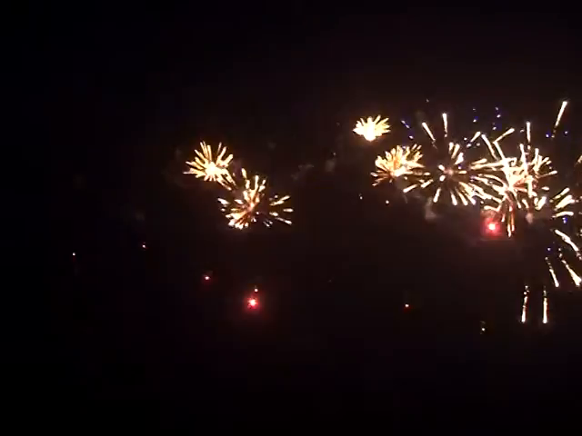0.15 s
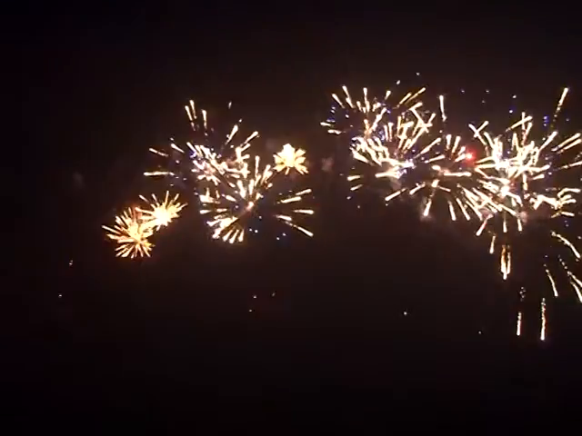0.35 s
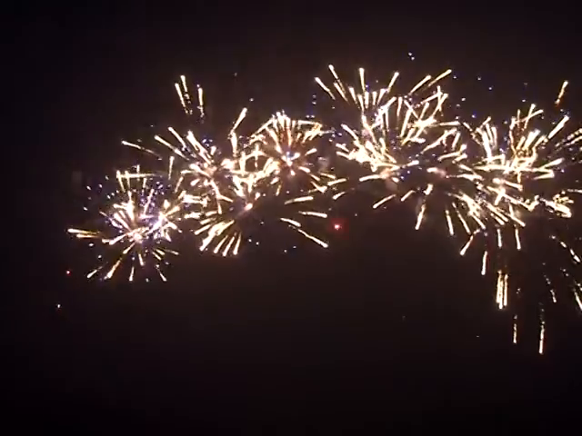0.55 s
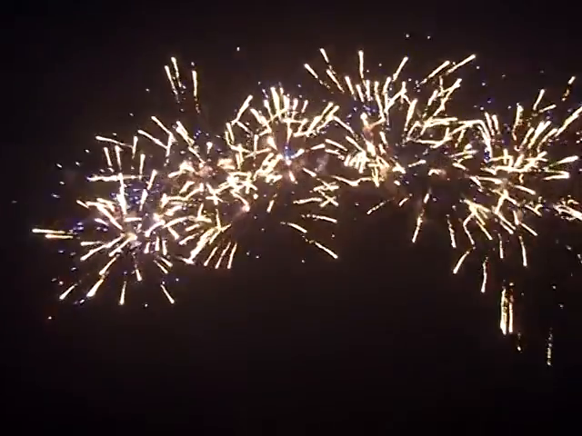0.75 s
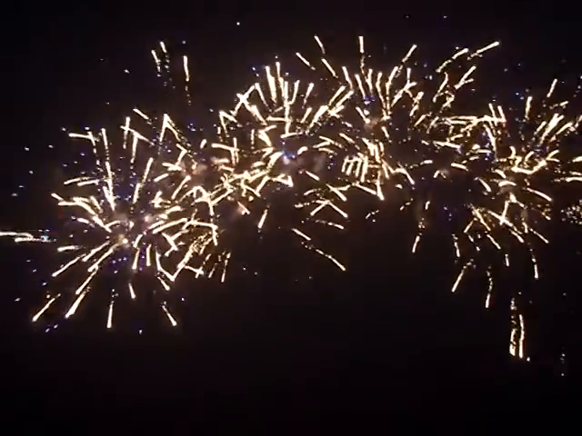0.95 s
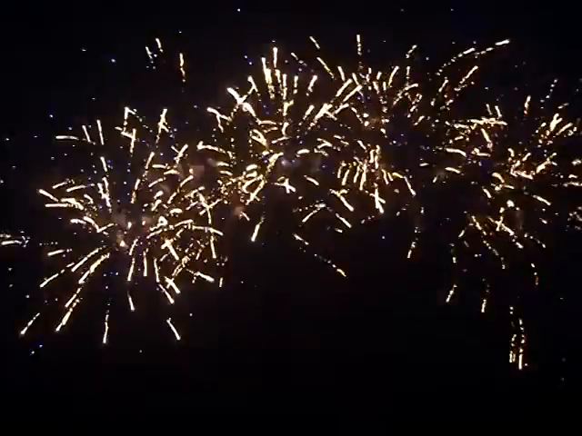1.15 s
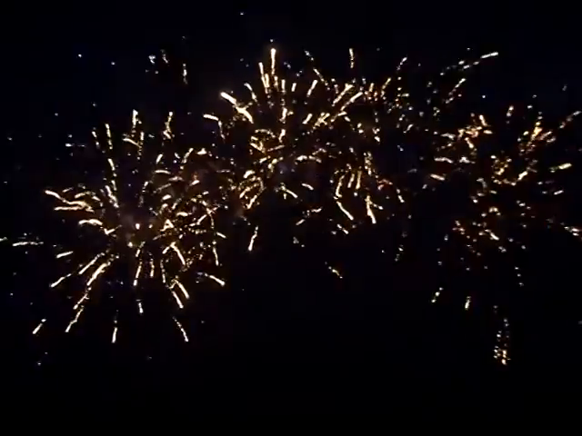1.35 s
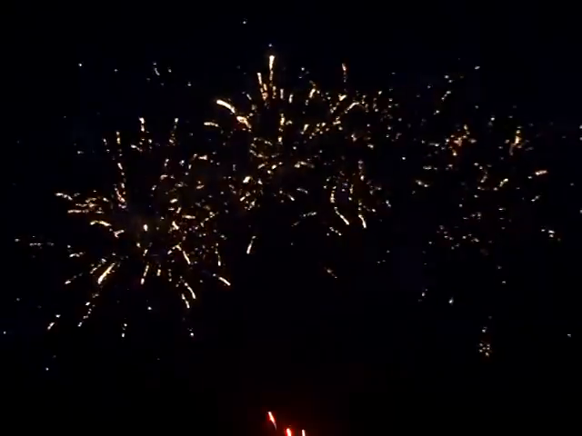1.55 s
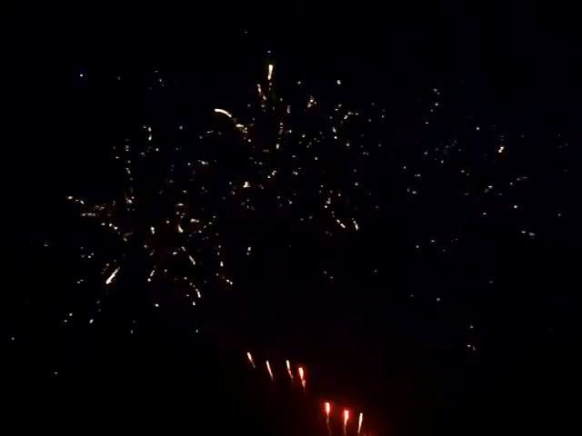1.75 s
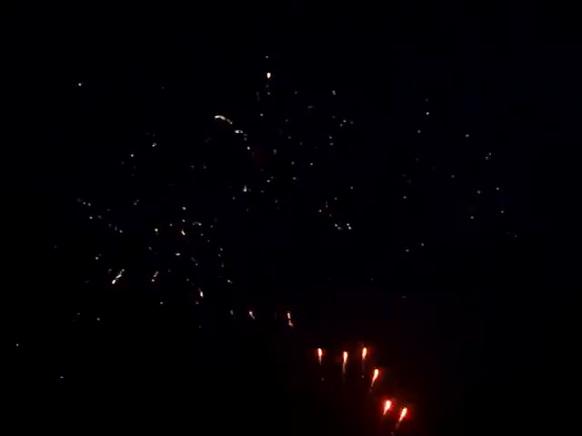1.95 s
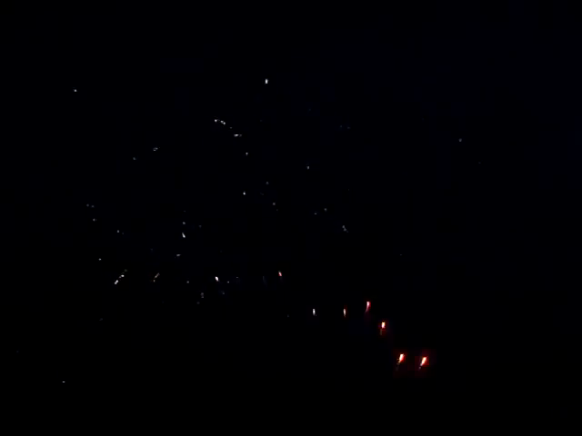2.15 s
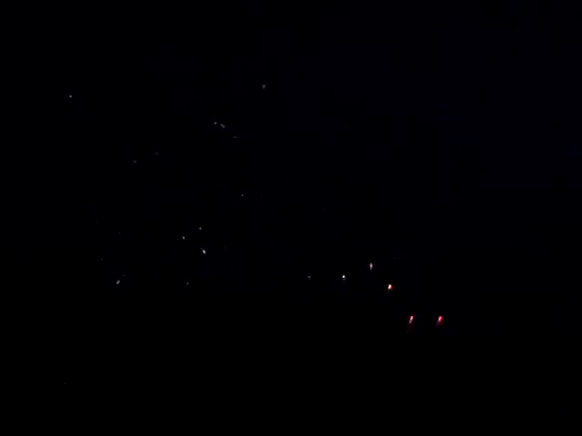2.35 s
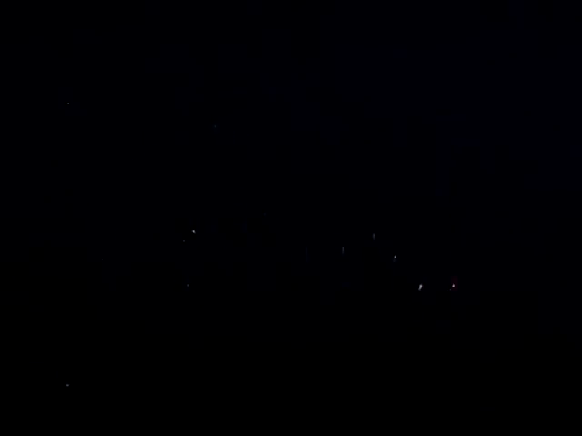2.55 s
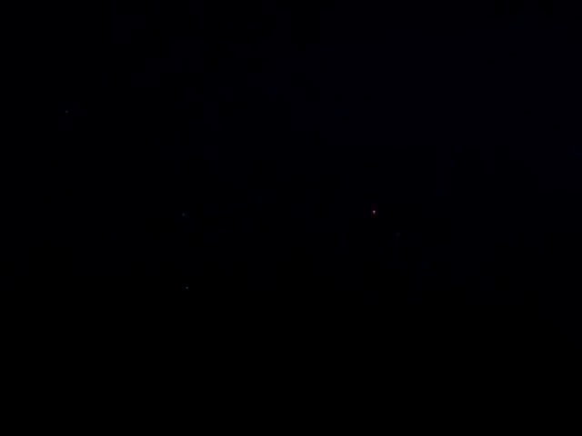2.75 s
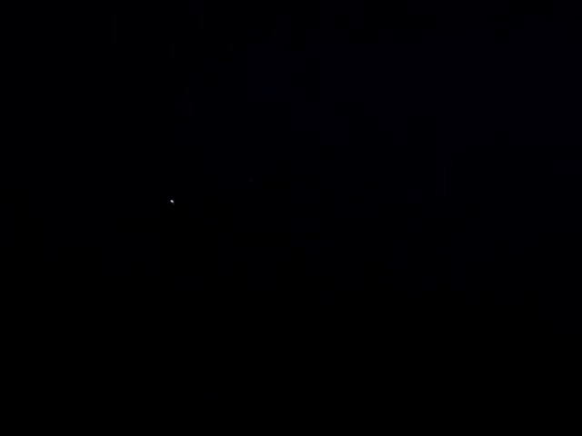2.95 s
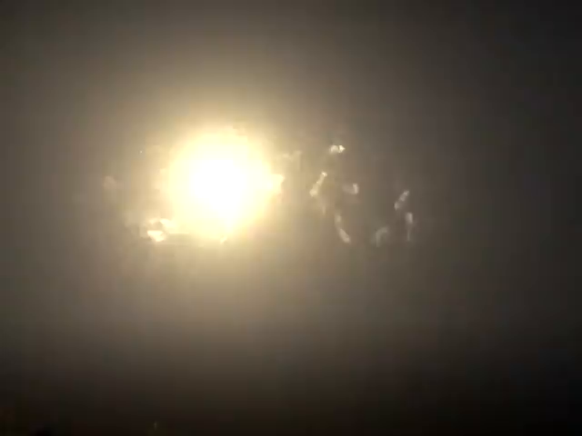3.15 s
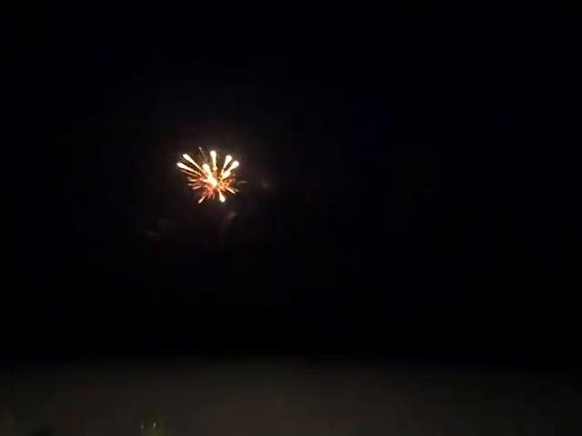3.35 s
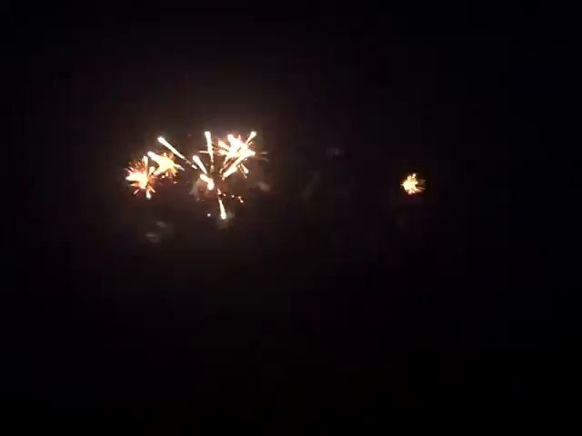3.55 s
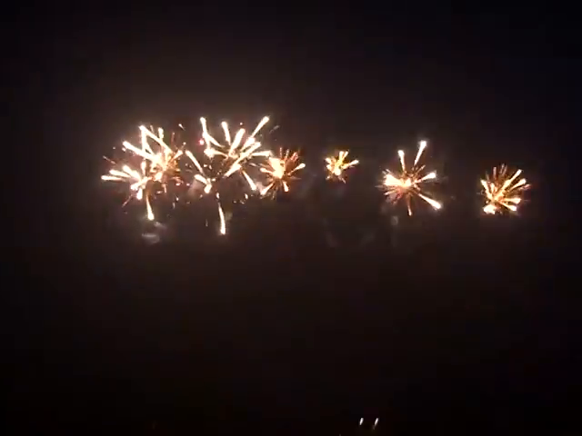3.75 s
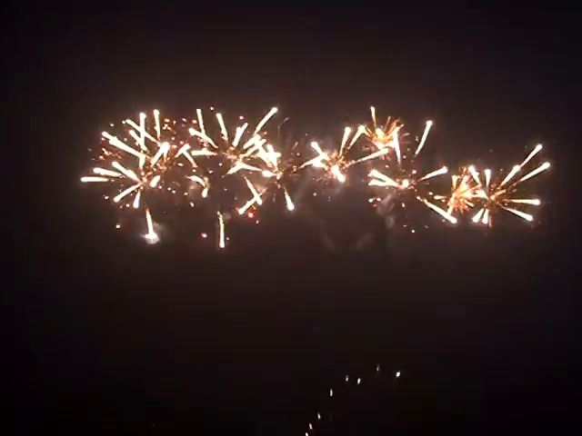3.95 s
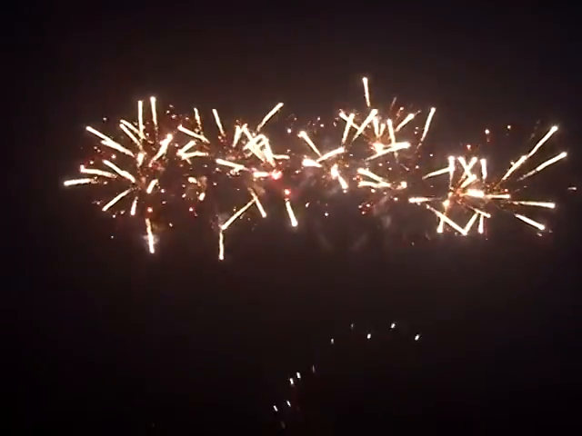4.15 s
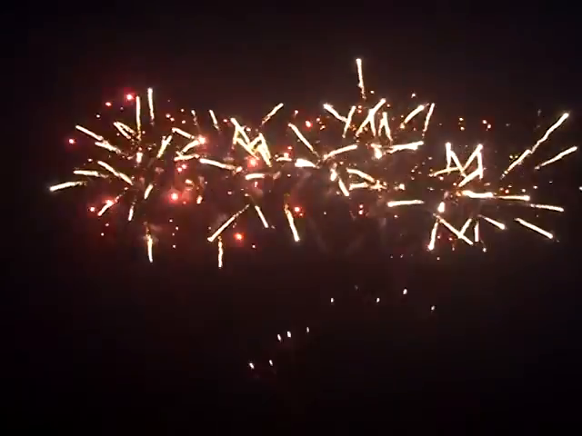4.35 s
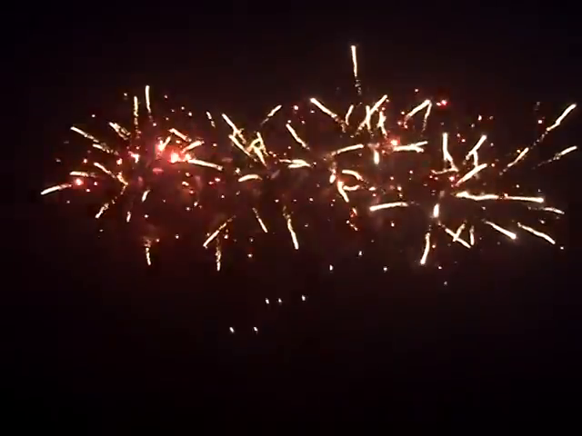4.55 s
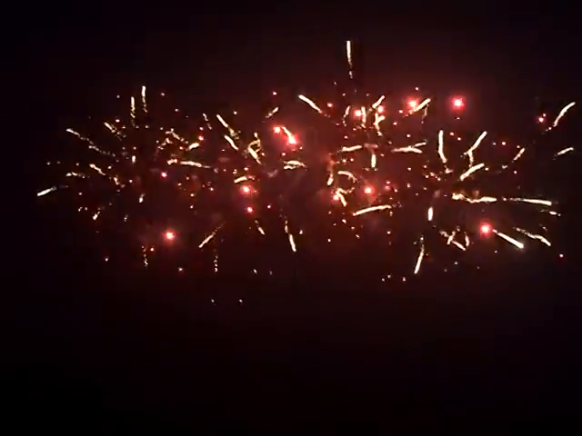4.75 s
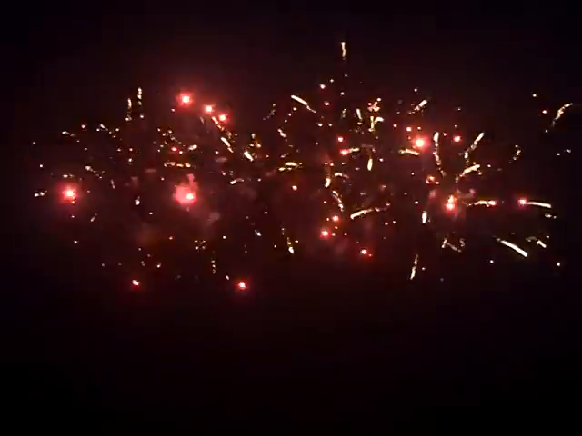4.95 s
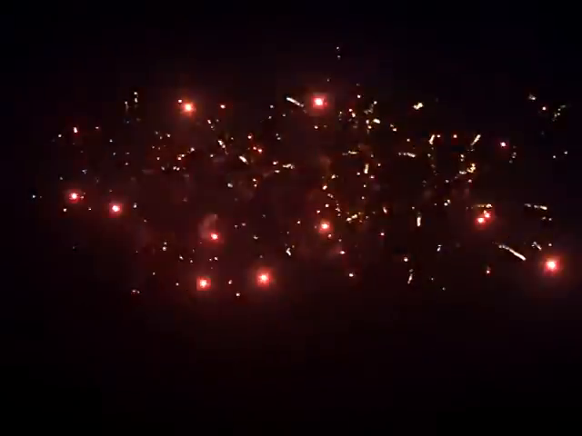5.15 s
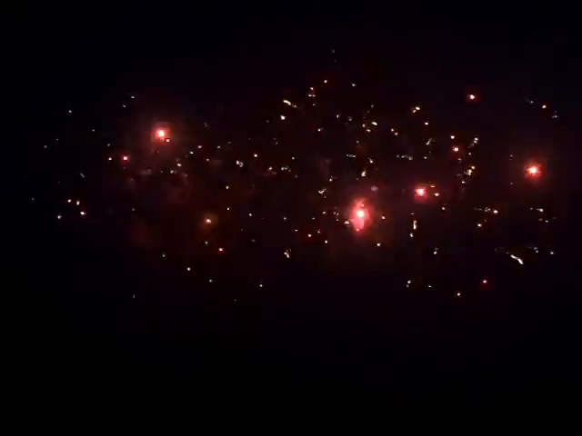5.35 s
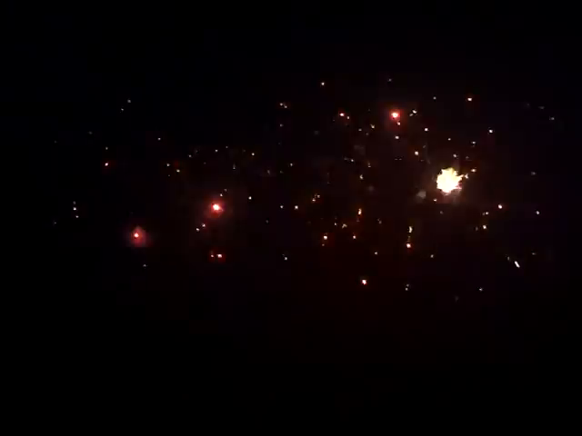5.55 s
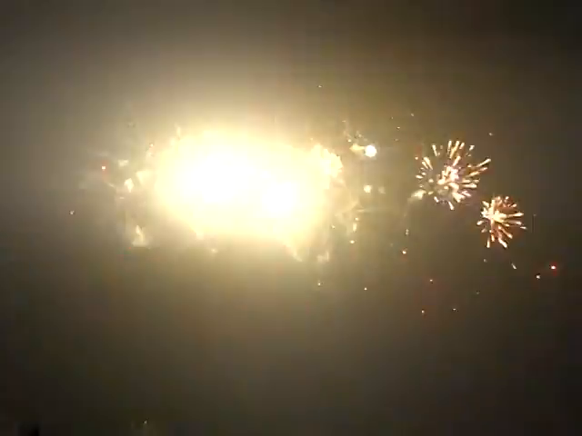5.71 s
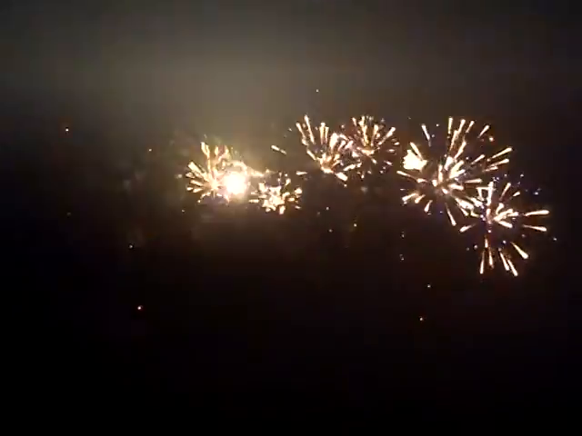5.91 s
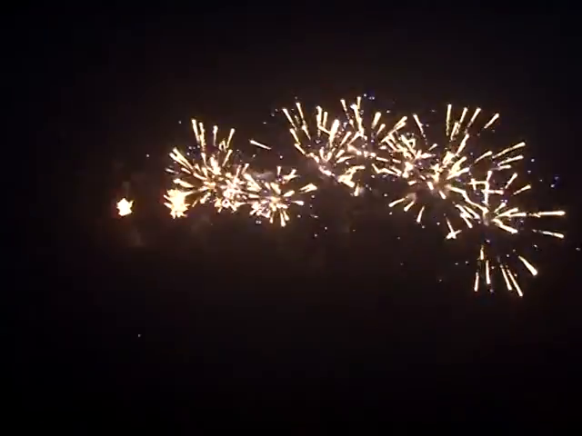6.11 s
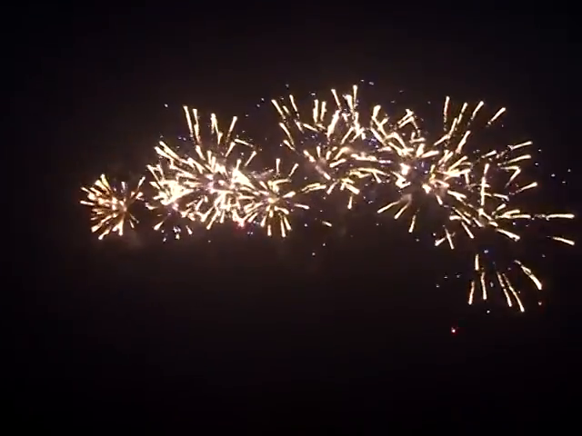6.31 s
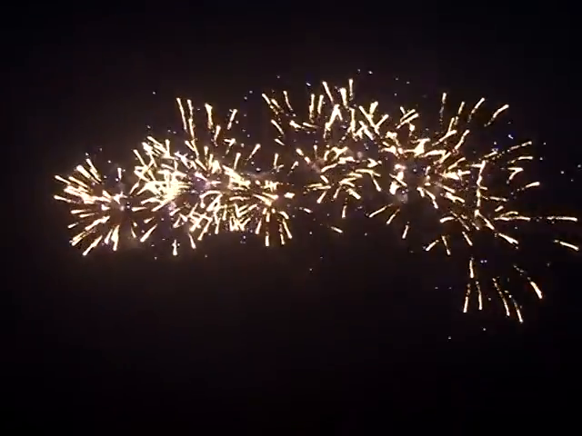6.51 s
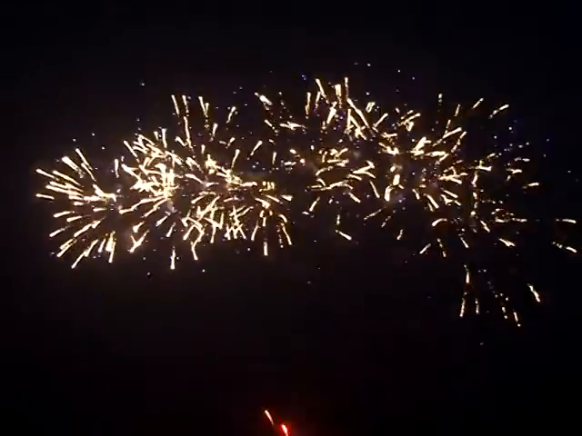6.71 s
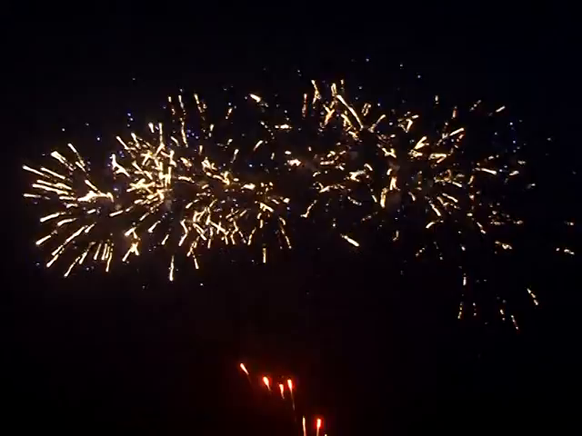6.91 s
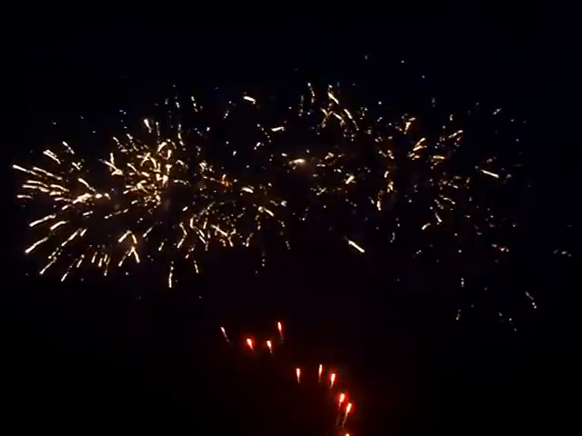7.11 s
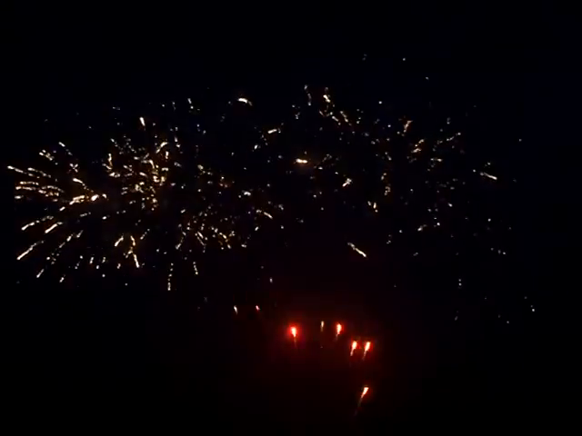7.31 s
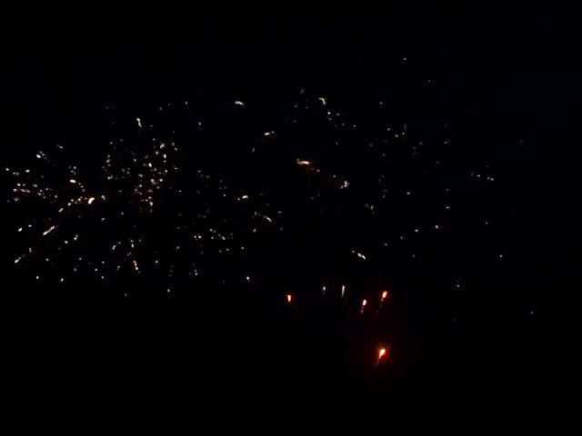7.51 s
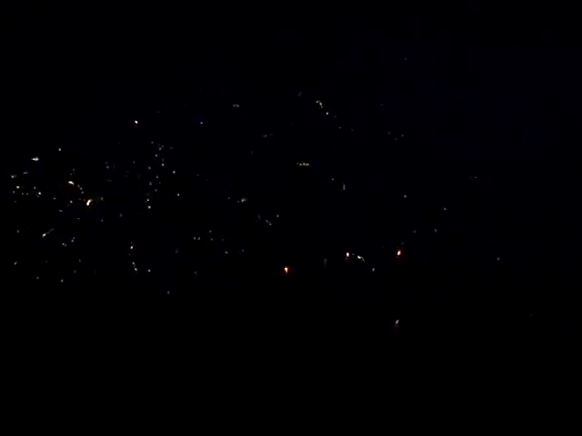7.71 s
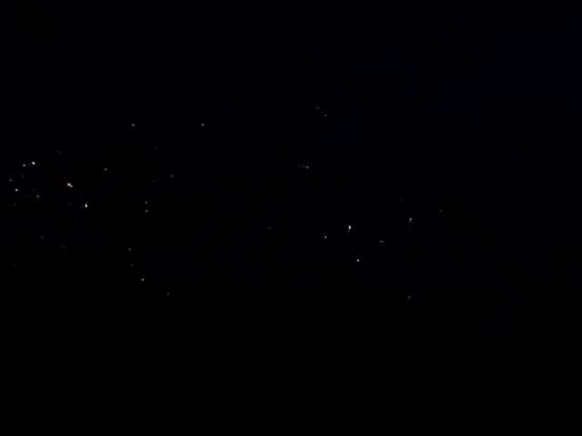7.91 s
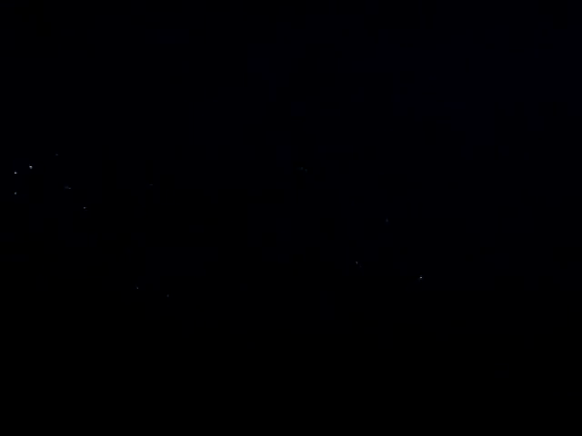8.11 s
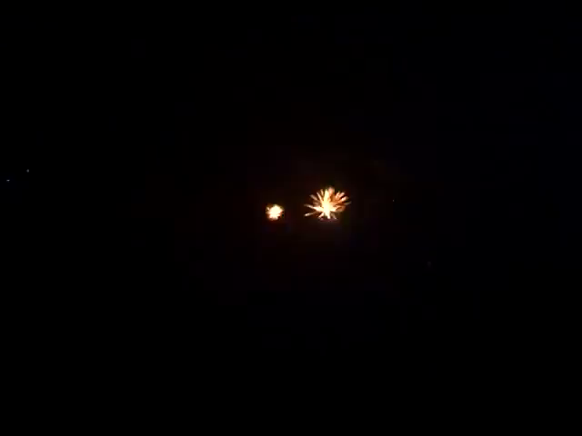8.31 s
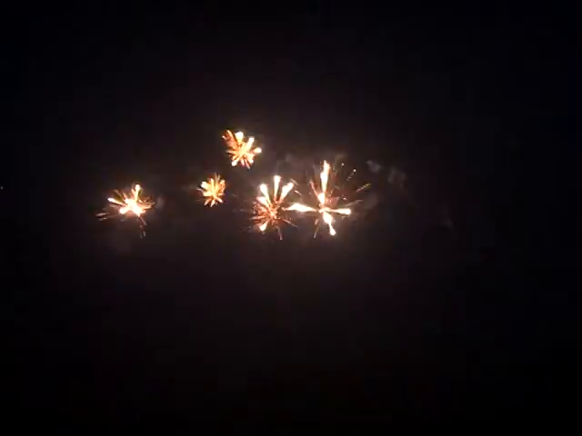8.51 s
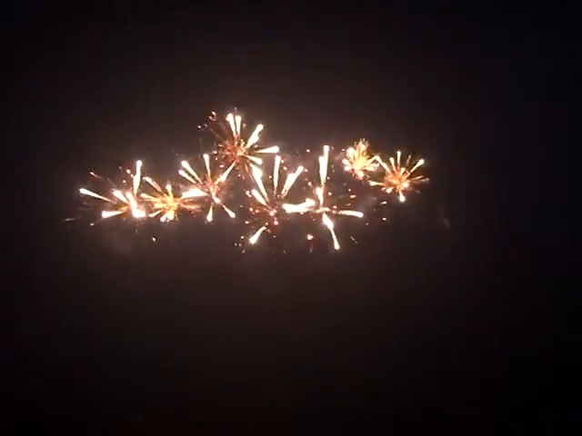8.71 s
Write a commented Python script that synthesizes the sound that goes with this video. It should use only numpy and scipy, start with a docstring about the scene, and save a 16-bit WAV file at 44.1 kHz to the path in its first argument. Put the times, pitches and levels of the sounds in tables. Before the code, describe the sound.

Fireworks burst outdoors in rapid volleys of loud, sharp, echoing bangs, with quieter launch thumps and crackling hiss in between.

```python
"""A firework cake at night. A volley of shells bursts overhead; each blast wave reflects from the ground
and nearby walls, then rolls away while the stars hiss and crackle. Near 2 s mortar tubes thump out a
salvo, and near 4 s a second volley bursts amid more launches. Glittering tails hiss until the third
volley at 6 s; the tubes fire again at 7 s, and two last shells burst near 9 s. Throughout, the bursts
overload the microphone and its gain control ducks after them, over a low rush of air."""
import sys
import numpy as np
from scipy import signal
from scipy.fft import rfft, irfft, next_fast_len
from scipy.io import wavfile
from scipy.ndimage import uniform_filter1d

SR = 44100
rng = np.random.default_rng(int(sys.argv[2]) if len(sys.argv) > 2 else 0)


def persist_wave(psi):
    """Save psi, clipped to +-1, as 16-bit WAV."""
    counts = np.round(np.clip(psi, -1, 1) * 32767).astype(np.int16)
    wavfile.write(sys.argv[1], SR, np.atleast_2d(counts).T)


N = 391166


# shell bursts, one list per volley: start_s, blast_db, wall_echo_db
VOLLEYS = [
    [(.065, 20, -7), (.3787, 22.5, -4), (.4884, 18, -0.5), (.5715, 21, -1), (.5992, 20, -5),
     (.6243, 18, -1), (.653, 17, -6), (.8119, 23.5, -9), (.8231, 16.5, -14), (.833, 16, -2)],
    [(3.719, 21, -5), (3.9483, 18.5, 3), (3.9965, 20.5, -4.5), (4.0568, 19.5, -1), (4.0808, 23, -2),
     (4.1591, 21.5, 0), (4.1789, 14, -1.5), (4.225, 24, 1), (4.3656, 24.5, 0)],
    [(6.0579, 20.5, -7), (6.1434, 10.5, -5), (6.172, 24, -4.5), (6.2622, 18.5, -8), (6.276, 17, -15),
     (6.2915, 21, 0), (6.42, 21, -3), (6.478, 15, -0.5), (6.595, 23, -9), (6.65, 20.5, -19)],
    [(8.7867, 21, -2), (8.8373, 14.5, -4)],
]
def shells(first_delay_s=0.021, drift_s_per_s=0.00854):
    """Path difference: as the fan of shells sweeps the sky, the wall echo lags more within a volley."""
    return [(s, db, first_delay_s + drift_s_per_s * (s - volley[0][0]), wall_db)
            for volley in VOLLEYS for s, db, wall_db in volley]


# spectra of a burst's crack, wall clap and reverberant tail: frequency_hz, density_db
CRACK_SPECTRUM = [(150, -32), (450, 2.5), (750, 1), (1000, -0.5), (1500, -3.5), (2600, -4.5), (4500, -14),
                  (7000, -21.5), (14000, -24.5)]
CLAP_SPECTRUM = [(40, -37), (130, -8.5), (330, 2.5), (560, 1), (700, -5), (980, -2), (1450, -13),
                 (1750, -12), (2300, -14.5), (3300, -18.5), (6700, -28), (14000, -58)]
BURST_TAIL = [(30, -30), (70, -17.5), (140, -6.5), (270, -5), (540, -5.5), (780, -13.5), (1050, -14),
              (1400, -18), (4600, -28), (8500, -36), (13000, -47.5)]
def bursts(ground_db=-4, crack_db=-19, crack_t60_s=0.032, slat_hz=1850, tail_db=-37):
    """Reflection: each shell's blast wave bounces off the ground and returns from walls as a clap."""
    shots = shells()
    waves, crack_power, wall_power = np.zeros((3, N))
    t = np.arange(1, SR // 5) / SR
    variations = rng.standard_normal((len(shots), 3))
    for (s, db, wall_delay_s, wall_db), (size, height, angle) in zip(shots, variations):
        wave = amp(db) * blast(push_s=.0017 * np.exp(.1 * size), ring_hz=300, damping=.42)
        ground_delay_s = .0039 * np.exp(.08 * height)
        add(waves, s, wave)
        add(waves, s + ground_delay_s, amp(ground_db) * softened(wave, cutoff_hz=4000))
        add(crack_power, s, amp(db + crack_db - 60 * t / crack_t60_s) ** 2)
        echo_level = amp(wall_db) * np.exp(-.5 * (np.log(t / wall_delay_s) / .34) ** 2)
        add(wall_power, s, echo_level ** 2)
        # roughly spaced slats answer one after the other, at a faint falling pitch
        pitch_hz = slat_hz * np.exp(.06 * angle) * (wall_delay_s / t) ** .2
        phase = np.cumsum(2 * np.pi * pitch_hz / SR + .08 * rng.standard_normal(len(t)))
        add(waves, s, amp(-12) * echo_level * np.sin(phase))
    clap = np.sqrt(wall_power) * grains(CLAP_SPECTRUM, rate_hz=1200, spread_db=0.5, share=0.83)
    crack = np.sqrt(crack_power) * patchy(noise(CRACK_SPECTRUM), depth_db=2.5)
    tail = amp(tail_db) * reverberation(shots, BURST_TAIL, build_s=0.0032)
    return waves + crack + clap * pan(1) + tail


def blast(push_s, ring_hz, damping):
    """Friedlander wave: a shock, its push and its suction; the microphone's bass cut swings it back."""
    age = np.arange(SR // 16) / SR / push_s
    omega = 2 * np.pi * ring_hz
    high_pass = signal.bilinear([1, 0, 0], [1, 2 * damping * omega, omega ** 2], SR)
    return signal.lfilter(*high_pass, (1 - age) * np.exp(-age))


# mortar shots: start_s, level_db
LAUNCHES = [(1.662, 1), (1.7036, -4), (1.7575, 0.5), (1.8033, -0.5), (1.8552, -2.5), (1.8944, -3),
            (1.946, 0.5), (2.0053, 0.5), (2.0499, -0.5), (2.1041, -1), (3.918, -10), (4.0323, 1),
            (4.1128, 2.5), (4.3447, -3.5), (4.432, -6), (6.9203, -5), (6.936, 0), (6.977, -2), (7.0331, -4),
            (7.0978, 0), (7.168, -3), (7.202, 0), (7.261, 2), (7.3169, -3), (7.365, -1), (7.4044, -3.5)]
# resonances of the wall beside the tubes: pitch_hz, level_db, t60_s
WALL_MODES = [(66, -18, .16), (128, -16, .15), (255, -21, .11), (335, -15, .18), (385, -19, .1),
              (590, -22, .15)]
# spectrum of a launch's reverberant tail: frequency_hz, density_db
LAUNCH_TAIL = [(25, -34), (45, -22), (66, 7), (90, -16), (130, 5), (180, -1.5), (330, 0.5), (550, -3.5),
               (900, -14.5), (1800, -13.5), (5400, -25), (8800, -32.5), (13000, -44)]
def launches(blast_db=1, wall_delay_s=.0157, wall_db=-2, spit_db=-12, spit_t60_s=0.023, tail_db=-25):
    """Impulse excitation: each tube thumps and spits gas; a wall reflects it and rings in its modes."""
    waves, spit_level = np.zeros((2, N))
    t = np.arange(SR // 6) / SR
    ring = sum(amp(db - 60 * t / t60) * np.sin(2 * np.pi * hz * t) for hz, db, t60 in WALL_MODES)
    for (s, db), (size, place) in zip(LAUNCHES, rng.standard_normal((len(LAUNCHES), 2))):
        thump = blast(push_s=0.0024 * np.exp(0.23 * size), ring_hz=140, damping=0.69)
        front = amp(blast_db) * softened(thump, cutoff_hz=6260)
        echo_s = s + wall_delay_s * np.exp(0.017 * place)
        for arrival_s, path_db in [(s, db), (echo_s, db + wall_db)]:
            add(waves, arrival_s, amp(path_db) * front)
            add(spit_level, arrival_s, amp(path_db + spit_db - 60 * t / spit_t60_s))
        add(waves, echo_s, amp(db) * ring)
    gas_spectrum = [(100, -15), (500, 5.5), (1200, -0.5), (2200, -2.5), (4400, -2), (8500, -15.5),
                    (11000, -36), (14000, -63)]
    spit = spit_level * patchy(noise(gas_spectrum), depth_db=2.5)
    return waves + spit + amp(tail_db) * reverberation(LAUNCHES, LAUNCH_TAIL, build_s=0.0015)


# reverberation time of the surroundings: frequency_hz, t60_s
DECAY_TIMES = [(60, 0.84), (350, 1.59), (1500, 1.92), (5000, 2.03), (11000, 0.68)]
def reverberation(shots, spectrum, build_s):
    """Diffuse decay: scattered sound dies exponentially, fastest in the deep bass and top treble."""
    hz, t, bins = signal.stft(noise(spectrum), SR, nperseg=256)
    t60_s = along(DECAY_TIMES, hz)[:, None]
    power = np.zeros(bins.shape[1:])
    for s, db, *_ in shots:
        live = (t > s) & (t < s + 2)
        age = t[live] - s
        power[:, live] += (amp(db - 60 * age / t60_s) * (1 - np.exp(-age / build_s))) ** 2
    return signal.istft(bins * np.sqrt(power), SR, nperseg=256)[1][:, :N]


# spectrum of echoes from the land: frequency_hz, density_db
ROLL_SPECTRUM = [(25, -27), (70, -13), (150, -6), (310, 3.5), (540, 0.5), (780, -6), (1050, -6),
                 (1400, -13.5), (2200, -60.5)]
def far_echoes(bank_delay_s=.2, bank_db=-35.5, roll_db=-47):
    """Distant reflection: each burst returns as a dull boom from a bank and a lumpy roll from the land."""
    returns = [(s + bank_delay_s, db) for s, db, *_ in shells()]
    booms = puffs(returns, ROLL_SPECTRUM, gain_db=bank_db, rise_s=0.012, t60_s=0.097)
    roll = grains(ROLL_SPECTRUM, rate_hz=380, spread_db=3, share=.45)
    return booms + amp(roll_db) * swells(shells(), turn_s=0.37, rise=1, fall=2) * roll


# when each volley's fan of shells faces a far slope: after_first_burst_s
FACING_TIMES = [0.52, 0.56, 0.32, .4]
def slope_echo(delay_s=.535, width_s=0.061, surge_db=-19, lead_s=0.012, smear_s=.06):
    """Directional echo: bursts facing the slope return as a surge from trees and a boom from the ground."""
    t, power, returns = np.arange(N) / SR, np.zeros(N), []
    for volley, facing_s in zip(VOLLEYS, FACING_TIMES):
        for s, *_ in volley:
            facing = 1 / (1 + ((s - volley[0][0] - facing_s) / width_s) ** 2)
            power += facing ** 2 * np.exp(-((t - s - delay_s + lead_s) / smear_s) ** 2)
            returns.append((s + delay_s, 20 * np.log10(facing)))
    tree_spectrum = [(60, -25), (150, -8.5), (330, 4.5), (560, 2), (750, -8.5), (1050, -4), (1500, -16),
                     (2300, -15), (4500, -18.5), (8000, -28), (13000, -62)]
    surge = amp(surge_db) * np.sqrt(power) * grains(tree_spectrum, rate_hz=500, spread_db=2.5, share=.45)
    return surge + puffs(returns, ROLL_SPECTRUM, gain_db=-8, rise_s=0.01, t60_s=0.051)


# spectra of the burning: frequency_hz, density_db
HISS_SPECTRUM = [(900, -19), (1600, 7), (2600, -1), (4600, -13), (6500, -18), (9000, -103)]
FIZZ_SPECTRUM = [(4500, -1), (7000, -8.5), (9000, -12), (11000, -16), (13000, -45)]
def burning():
    """Incoherent addition: all that is alight sums in power to one crackling hiss and fine fizz."""
    hiss_level, fizz_level = np.sqrt(stars() ** 2 + climb() ** 2 + glitter() ** 2)
    hiss = grains(HISS_SPECTRUM, rate_hz=700, spread_db=3.5, share=.35)
    fizz = grains(FIZZ_SPECTRUM, rate_hz=1200, spread_db=4, share=.35)
    return hiss_level * hiss + fizz_level * fizz


# gold and red stars, alternating by volley: hiss_db, fizz_db, flare_s, fade_exponent
STAR_KINDS = [(-32.5, -43.5, 0.29, 2.24), (-38, -50, 0.51, 2.37)]
def stars():
    """Combustion noise: the hiss and fizz levels follow the stars as they catch, flare and burn out."""
    power = np.zeros((2, N))
    for k, volley in enumerate(VOLLEYS):
        hiss_db, fizz_db, flare_s, fall = STAR_KINDS[k % len(STAR_KINDS)]
        for band, db in enumerate([hiss_db, fizz_db]):
            power[band] += swells([(s, db) for s, *_ in volley], flare_s, rise=4, fall=fall) ** 2
    return np.sqrt(power)


def climb(hiss_db=-42, fizz_db=-57):
    """Spreading loss: the hiss and fizz levels of launched shells fall as they climb away."""
    return amp([[hiss_db], [fizz_db]]) * swells(LAUNCHES, turn_s=0.062, rise=1, fall=1.28)


# the glittering tails of one salvo: start_s, end_s, hiss_db, fizz_db
GLITTER = (4.7, 5.92, -46.5, -52)
def glitter(fade_s=0.15):
    """Steady combustion: the tails hold their hiss and fizz levels, fading in before and out after."""
    start_s, end_s, hiss_db, fizz_db = GLITTER
    t = np.arange(N) / SR
    outside_s = np.maximum(np.maximum(start_s - t, t - end_s), 0)
    return amp([[hiss_db], [fizz_db]]) * np.exp(-outside_s / fade_s)


# single stars popping: start_s, level_db
STAR_POPS = [(2.78, -35), (2.8494, -34), (5.0459, -23)]
def star_pops():
    """Broadband transients: single stars go off with a brief, bright pop."""
    spectrum = [(1000, -8), (2600, 2), (5500, -6), (12000, -42)]
    return puffs(STAR_POPS, spectrum, gain_db=-3, rise_s=0.00032, t60_s=0.02)


# spectrum of the night air: frequency_hz, density_db
AIR_SPECTRUM = [(25, -15), (64, -4.5), (110, -8), (180, -5), (290, -2.5), (560, -7), (800, -11.5),
                (1200, -12), (1450, -19.5), (1750, -9.5), (2200, -18.5), (3200, -20.5), (4500, -29),
                (9000, -42), (12000, -43)]
# narrow background bands: pitch_hz, half_width_hz, level_db
WHINE_BANDS = [(1187, 34, 1), (1670, 45, -2), (3270, 85, -10)]
def night(rush_db=-40, whine_db=-55):
    """Stationary noise: a low rush of air, with narrow bands heard as a faint whine."""
    bands = lambda hz: sum(amp(db) / (1 + ((hz - centre) / width) ** 2)
                           for centre, width, db in WHINE_BANDS)
    whine = unit(filtered(rng.standard_normal((2, N)), bands))
    return amp(rush_db) * noise(AIR_SPECTRUM) + amp(whine_db) * whine


def puffs(shots, spectrum, gain_db, rise_s, t60_s):
    """Exponential decay: one short puff of noise per (start_s, level_db) shot."""
    envelope, t = np.zeros(N), np.arange(SR // 5) / SR
    for s, db in shots:
        add(envelope, s, amp(db + gain_db - 60 * t / t60_s) * (1 - np.exp(-t / rise_s)))
    return envelope * noise(spectrum)


def swells(shots, turn_s, rise, fall):
    """Power-law envelopes: each shot's level grows, turns near turn_s and fades; their powers add."""
    age = np.arange(1, N + 1) / SR / turn_s
    shape, power = (2 / (age ** -rise + age ** fall)) ** 2, np.zeros(N)
    for s, db, *_ in shots:
        add(power, s, amp(db) ** 2 * shape)
    return np.sqrt(power)


def grains(spectrum, rate_hz, spread_db, share):
    """Shot noise: random pops of uneven size carry a share of the power, smooth noise the rest."""
    onsets = rng.random(N) < rate_hz / SR
    sizes = onsets * amp(spread_db * np.minimum(rng.standard_normal(N), 2))
    pops = unit(sizes * rng.standard_normal((2, N)))
    return coloured(np.sqrt(share) * pops + np.sqrt(1 - share) * rng.standard_normal((2, N)), spectrum)


def noise(spectrum):
    """Gaussian noise: steady, stereo, of rms 1."""
    return coloured(rng.standard_normal((2, N)), spectrum)


# likeness of left and right: frequency_hz, correlation
COHERENCE = [(60, 0.88), (150, 0.99), (300, 0.91), (550, 0.82), (1000, 0.57), (2000, 0.4), (8000, 0.67)]
def coloured(pair, spectrum):
    """Partial coherence: two unrelated signals, shaped as mid and side, are nearly mono in the bass."""
    def response(hz):
        angle = np.arccos(along(COHERENCE, hz)) / 2
        return amp(along(spectrum, hz)) * [np.cos(angle), np.sin(angle)]
    mid, side = filtered(pair, response)
    return unit(np.array([mid + side, mid - side]))


def patchy(x, depth_db):
    """Random spectral modulation: the colour changes from one shot to the next."""
    bins = signal.stft(x, nperseg=256)[2]
    ripple = uniform_filter1d(rng.standard_normal(bins.shape[1:]), size=5, axis=0)
    ripple = uniform_filter1d(ripple, size=10, axis=1)
    return unit(signal.istft(bins * amp(depth_db * unit(ripple)), nperseg=256)[1][:, :N])


def softened(x, cutoff_hz):
    """Low-pass filtering: treble is lost on the way."""
    return signal.lfilter(*signal.butter(2, cutoff_hz, fs=SR), x)


def filtered(x, response):
    """Linear filtering: the spectrum of x times a frequency response."""
    size = next_fast_len(N + SR // 4)
    return irfft(rfft(x, size) * response(np.fft.rfftfreq(size, 1 / SR)), size)[..., :N]


def along(points, hz):
    """Interpolation of (frequency_hz, value) points on a log frequency axis."""
    frequencies, values = np.transpose(points)
    return np.interp(np.log(hz + 1), np.log(frequencies + 1), values)


def add(track, start_s, sound):
    """Superposition: mix a sound into a track from start_s on."""
    start = max(round(start_s * SR), 0)
    part = track[..., start:start + sound.shape[-1]]
    part += sound[..., :part.shape[-1]]


def pan(right_db):
    """Level difference: the right channel gains what the left loses."""
    return amp([[-right_db], [right_db]])


def amp(db):
    """Decibels to amplitude ratio."""
    return 10 ** (np.asarray(db) / 20)


def unit(x):
    """Normalisation to rms 1."""
    return x / np.sqrt(np.mean(x ** 2) + 1e-20)


def scene():
    """Superposition: the fireworks and their echoes over the low rush of the night air."""
    distant = star_pops() + far_echoes() + slope_echo() + burning()
    return bursts() + launches() * pan(.7) + distant * pan(.5) + night() * pan(1.3)


def record(dry, knee=5, threshold_db=-13, release_s=0.077, least_gain=.68, bass_hz=40, top_hz=14600):
    """Saturation and compression: the microphone clips, gain control ducks, the band edges are cut."""
    clipped = dry / (1 + np.abs(dry) ** knee) ** (1 / knee)
    step = 1 / (release_s * SR)
    power = signal.lfilter([step], [1, step - 1], np.mean(clipped ** 2, axis=0))
    lag = SR // 150  # the first milliseconds slip through
    recent_rms = np.sqrt(np.pad(power, (lag, 0))[:N] + 1e-9)
    gain = np.clip(amp(threshold_db) / recent_rms, least_gain, 1)
    ducked = signal.lfilter(*signal.butter(1, bass_hz, 'high', fs=SR), clipped * gain)
    microphone = [(5000, -1.0), (9000, -2), (14000, -11.5)]  # frequency_hz, gain_db
    return filtered(ducked, lambda hz: amp(along(microphone, hz)) / (1 + (hz / top_hz) ** 60))


dry = scene()
out = record(dry)
persist_wave(out)
```